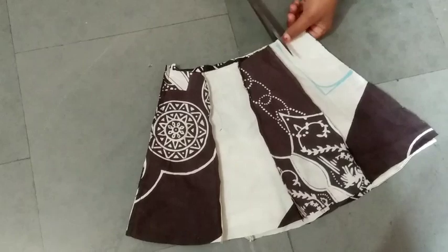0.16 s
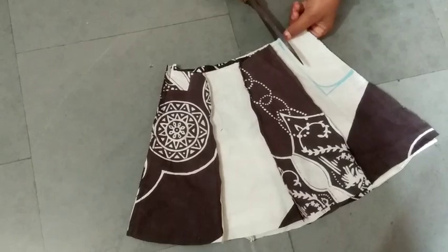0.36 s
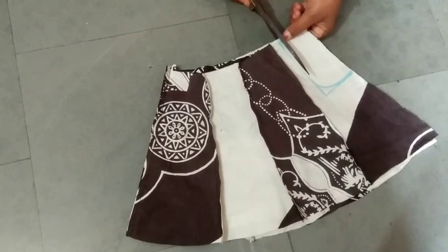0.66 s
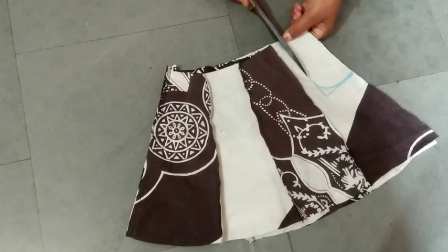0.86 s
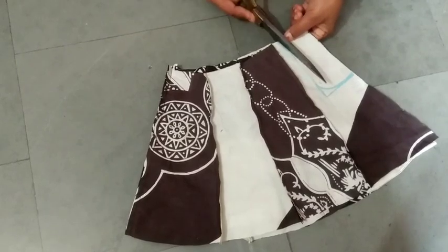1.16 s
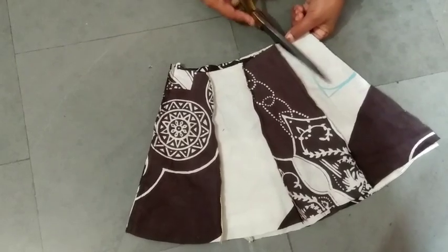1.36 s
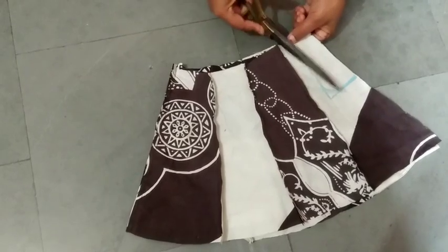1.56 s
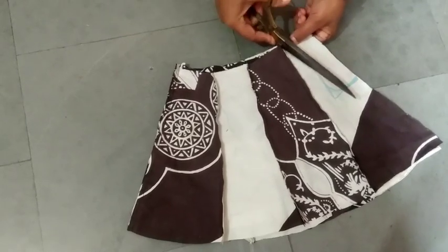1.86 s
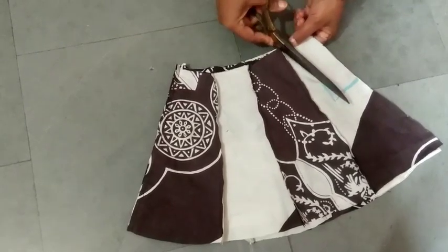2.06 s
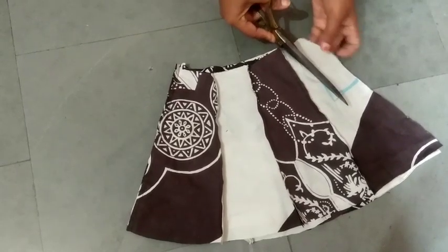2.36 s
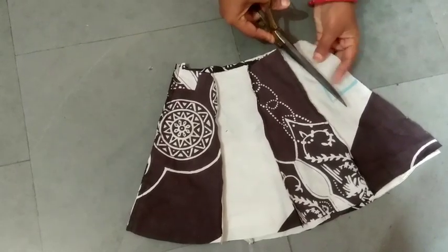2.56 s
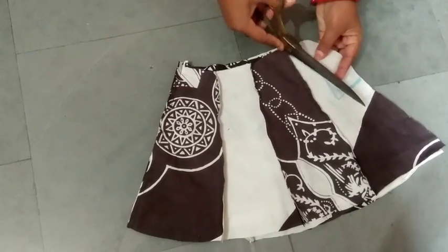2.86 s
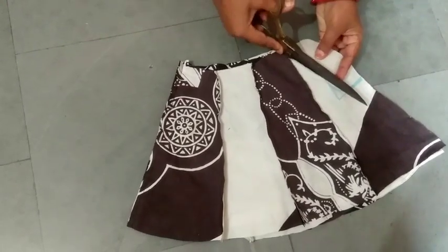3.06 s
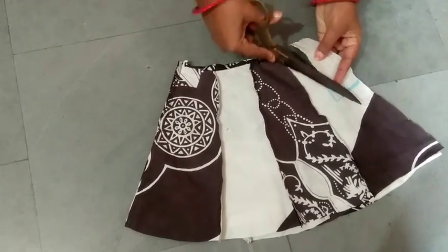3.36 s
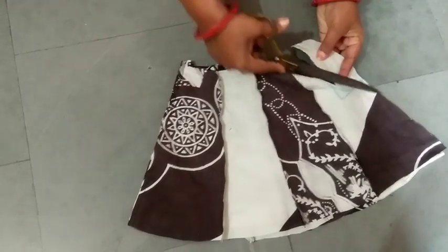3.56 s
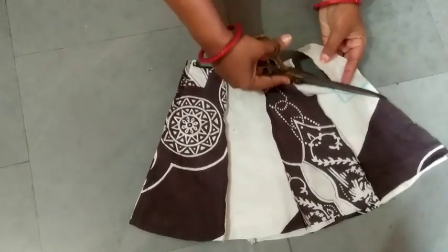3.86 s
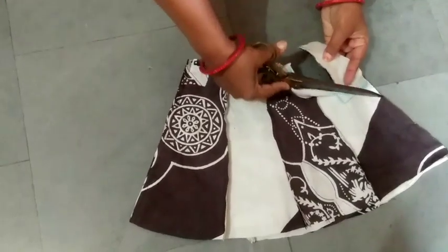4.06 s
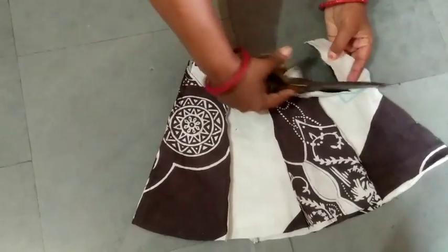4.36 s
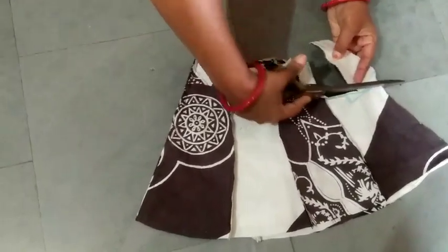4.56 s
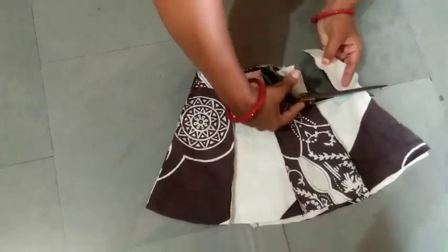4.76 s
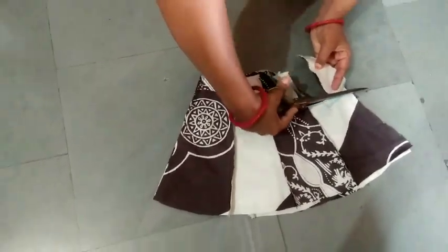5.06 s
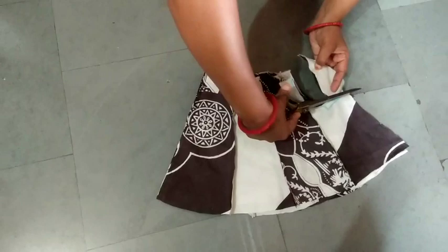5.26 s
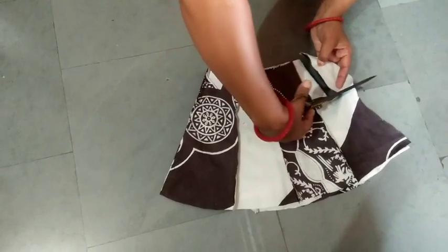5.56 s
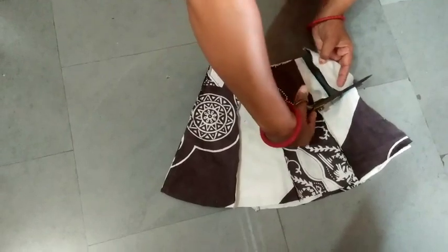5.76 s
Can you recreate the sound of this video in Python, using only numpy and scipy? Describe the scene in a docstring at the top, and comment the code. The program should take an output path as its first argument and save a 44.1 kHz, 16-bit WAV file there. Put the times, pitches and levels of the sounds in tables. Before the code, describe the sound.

Close scissor cuts through layered cloth in a small hard room, metallic and bright, with scraping blades, faint rustle and soft hand bumps.

```python
"""A small hard room with a stone floor, where heavy tailor's shears cut folded cotton cloth.
Each closing stroke snaps a run of threads (clumped noise snaps) that rings the blades (resonant filters).
Between strokes the edges slide apart with a hiss, one blade sings at times and the lower blade skids over the
stone with a gliding rasp. Steel ticks as the blades meet, hands bump and rumble softly, the cloth rustles,
and a short room tail and steady air noise lie around it all."""
import sys
import numpy as np
from scipy import signal
from scipy.fft import rfft, irfft, next_fast_len
from scipy.io import wavfile
from scipy.ndimage import uniform_filter1d, map_coordinates

SR = 44100
rng = np.random.default_rng(int(sys.argv[2]) if len(sys.argv) > 2 else 0)


def persist_wave(psi):
    """Save psi, clipped to +-1, as 16-bit WAV."""
    counts = np.round(np.clip(psi, -1, 1) * 32767).astype(np.int16)
    wavfile.write(sys.argv[1], SR, np.atleast_2d(counts).T)


N = 259964
T = np.arange(N) / SR

# All table levels are relative: each layer adds its own gain where it is mixed.
# Closing strokes. Each row: start in seconds, attack in seconds, hold in seconds, shearing level in dB,
# level of the blades' low ring in dB, level of its overtones in dB, resting pitch of the low ring in Hz.
CLOSING_STROKES = [(0.775, 0.067, 0.044, -29, -53, -48.5, 2621),
                   (1.212, 0.047, 0.064, -35.5, -47.5, -45.5, 2647),
                   (1.575, 0.065, 0.042, -30, -47, -45, 2555), (1.982, 0.069, 0.031, -28, -46, -48.5, 2540),
                   (3.186, 0.0081, 0.11, -34.5, -45, -54, 2587),
                   (4.074, 0.015, 0.056, -33.5, -47, -52.5, 2459),
                   (4.168, 0.018, 0.097, -42, -54, -68, 2527),
                   (5.098, 0.0062, 0.2, -43.5, -64, -61.5, 2514),
                   (5.807, 0.037, 0.054, -33.5, -54.5, -51, 2413)]
# Edge sliding on edge as the blades open or meet. Each row: start in seconds, attack in seconds,
# hold in seconds, hiss level in dB, bright fizz level in dB.
EDGE_SLIDES = [(0.0, 0.00036, 0.016, -43, -40), (0.07, 0.025, 0.1, -54.5, -51),
               (0.29, 0.023, 0.016, -53, -61), (0.36, 0.021, 0.49, -62, -72),
               (0.735, 0.04, 0.14, -46, -40.5), (0.98, 0.053, 0.081, -46, -42.5),
               (1.203, 0.022, 0.064, -41, -33.5), (1.36, 0.032, 0.026, -41.5, -38),
               (1.45, 0.028, 0.067, -50, -44), (1.598, 0.0049, 0.057, -40, -48),
               (1.78, 0.046, 0.091, -49.5, -42.5), (1.98, 0.0073, 0.04, -45, -56),
               (2.12, 0.03, 0.026, -54, -46), (2.566, 0.0081, 0.011, -55, -53),
               (2.698, 0.0079, 0.027, -52.5, -55), (2.8, 0.041, 0.12, -57, -56.5),
               (3.012, 0.0067, 0.041, -53.5, -56), (3.115, 0.016, 0.023, -48.5, -48),
               (3.35, 0.023, 0.025, -44, -39), (3.42, 0.011, 0.012, -42.5, -47),
               (3.5, 0.0087, 0.091, -43, -44), (3.62, 0.026, 0.045, -42, -45),
               (3.96, 0.033, 0.028, -42.5, -62), (4.22, 0.026, 0.042, -42, -49),
               (4.365, 0.013, 0.026, -47, -38), (4.45, 0.039, 0.21, -56.5, -54),
               (4.983, 0.013, 0.04, -43, -41.5), (5.102, 0.0073, 0.034, -40, -52),
               (5.3, 0.058, 0.014, -46, -42.5), (5.41, 0.023, 0.067, -55, -41.5),
               (5.772, 0.011, 0.093, -50.5, -39)]
# The blades' first bending mode, before its pitch sinks in each cut. Each row: centre in Hz,
# width in Hz of a single resonator, level in dB, left-right balance in dB.
LOW_RING_MODES = [(2590, 293, 0, 12.3)]
# Resonances of the sliding edges, before any glide. Each row: centre in Hz, width in Hz, level in dB,
# left-right balance in dB.
EDGE_MODES = [(7194, 1510, -1.5, -13.5), (7620, 1450, 4.5, -9.5), (8870, 520, 8, -8), (9250, 130, -10, -18)]
# Upper resonances of the edges. Each row: centre in Hz, width in Hz, level in dB, left-right balance in dB.
UPPER_EDGE_MODES = [(11080, 2200, -4.5, 8), (12280, 870, 11, 2.5), (13900, 2250, 5, 5.5),
                    (14700, 580, 4, -8)]

CUT_FALL_DB_PER_S, SLIDE_FALL_DB_PER_S = 237, 210  # how fast a movement dies away
SWELL_DB = 6  # how far single blade modes swell and fade


def amp(db):
    """Decibels to gain."""
    return 10 ** (np.asarray(db) / 20)


def unit(x):
    """Scale to rms 1."""
    return x / np.sqrt(np.mean(x ** 2) + 1e-20)


def along(points, hz):
    """Read (Hz, value) points on a log frequency axis."""
    f, v = np.transpose(points)
    return np.interp(np.log(hz + 1), np.log(f + 1), v)


def add(track, s, sound):
    """Mix a sound into a track at time s."""
    start = max(round(s * SR), 0)
    part = track[..., start:start + sound.shape[-1]]
    part += sound[..., :part.shape[-1]]


def balance(db):
    """Left and right gains that differ by db; positive leans to the left."""
    return amp([[db / 2], [-db / 2]])


def wobble(rate):
    """A smooth random curve, rate knots a second."""
    knots = rng.standard_normal(int(N * rate / SR) + 4)
    return map_coordinates(knots, [T * rate])


def envelope(attack, hold, fall_db_per_s):
    """One movement gathers speed, holds and dies away."""
    t = np.arange(SR * 3 // 4) / SR
    rise = np.minimum(t / attack, 1) ** 2
    return rise * amp(-fall_db_per_s * np.maximum(t - attack - hold, 0))


def strokes(rows, fall_db_per_s):
    """Rows of (start, attack, hold, levels) become one gain over time for each level; overlaps add as power."""
    power = np.zeros((len(rows[0][3:]), N))
    for start, attack, hold, *levels_db in rows:
        gains = np.outer(amp(levels_db), envelope(attack, hold, fall_db_per_s))
        add(power, start, gains ** 2)
    return np.sqrt(power)


def filtered(x, response):
    """Multiply the spectrum of x by a response of frequency."""
    m = next_fast_len(N + SR // 4)
    return irfft(rfft(x, m) * response(np.fft.rfftfreq(m, 1 / SR)), m)[..., :N]


def noise(spectrum):
    """Coloured stereo noise of rms 1, nearly mono in the bass."""
    # Likeness of the two sides. Each row: frequency in Hz, left-right correlation.
    likeness = [(40, .45), (170, .75), (300, .85), (600, .75), (1200, .45), (2500, .1), (10000, 0)]

    def mid_and_side(hz):
        turn = np.arccos(np.clip(along(likeness, hz), -1, 1)) / 2
        return amp(along(spectrum, hz)) * [np.cos(turn), np.sin(turn)]
    mid, side = filtered(rng.standard_normal((2, N)), mid_and_side)
    return unit(np.array([mid + side, mid - side]))


def crackle(rate, spread_db, clump_hz, clump_db):
    """Tiny snaps, rate a second, that come in clumps; each reaches the two microphones with its own phase."""
    snaps = (rng.random(N) < rate / SR) * amp(spread_db * np.clip(rng.standard_normal(N), -2, 2))
    phase = rng.uniform(0, 2 * np.pi, (2, N))
    pair = snaps * np.cos(phase) + np.roll(snaps * np.sin(phase), 1, axis=1)
    return unit(pair * amp(clump_db * np.clip(wobble(clump_hz), -2, 2)))


def catches(rate, t60, spread_db):
    """Force builds and lets go at random moments: sudden steps that die away."""
    t = np.arange(SR // 10) / SR
    steps = (rng.random(N) < rate / SR) * amp(spread_db * np.clip(rng.standard_normal(N), -1.5, 1.5))
    decay_power = amp(-120 * t / t60)  # twice the dB, as powers are summed
    power = signal.fftconvolve(steps ** 2, decay_power)[:N]
    return unit(np.sqrt(np.abs(power)))


def ring(x, modes, order=1):
    """Drive steel resonances that radiate unevenly to left and right; a higher order steepens their flanks."""
    def response(f):
        total = 0
        for k, (centre, width, db, pan_db) in enumerate(modes):
            resonance = 1j * f * width / (centre * centre - f * f + 1j * f * width)
            total = total + (-1) ** k * amp(db) * balance(pan_db) * resonance ** order
        # a narrow blade radiates little below its first mode
        return total * f ** 8 / (f ** 8 + (.75 * modes[0][0]) ** 8)
    return filtered(x, response)


def travelling(x, depth_db):
    """The crossing point travels along the edges, so that single blade modes swell and fade."""
    z = signal.stft(x, nperseg=512)[2]
    field = rng.standard_normal(z.shape) + rng.standard_normal(z.shape[1:])  # part own, part shared by both sides
    for _ in range(2):
        field = uniform_filter1d(uniform_filter1d(field, size=3, axis=1), size=14, axis=2)
    gain = amp(depth_db * np.clip(unit(field), -2.5, 1.3))
    gain /= np.sqrt(uniform_filter1d(gain ** 2, size=30, axis=1))  # neighbouring modes share the same energy
    return signal.istft(z * gain, nperseg=512)[1][:, :N]


def gliding(x, ratio):
    """Shift the pitch of a steady rasp by a ratio that changes over time."""
    return np.array([map_coordinates(side, [np.cumsum(ratio)], mode="mirror") for side in x])


def sinking(x, bend=.06, bend_s=0.075):
    """In each cut a ring starts sharp by the share bend and sinks to a resting pitch set by the grip."""
    ratio = np.ones(N)
    for start, *_, rest_hz in CLOSING_STROKES:
        since = T[T >= start] - start
        ratio[T >= start] = rest_hz / LOW_RING_MODES[0][0] * (1 + bend * np.exp(-since / bend_s))
    return gliding(x, ratio)


def floor_bounce(x, delay=0.0005087, share=0.93, sway=0.089):
    """The stone floor mirrors the blades; the notches glide as the shears rise and sink."""
    late = [np.interp(T - delay * (1 + sway * wobble(5.2)), T, side) for side in x]
    return (x - share * np.array(late)) / np.hypot(1, share)


def room_tone():
    """Steady air noise, coloured by the room's modes."""
    # Spectrum of the air noise. Each row: frequency in Hz, level in dB.
    air = [(15, -34), (25, -12), (75, -15.5), (160, -2), (331, 4.5), (919, -9.5), (1800, -5), (2630, -5),
           (4750, -12), (8810, -14.5), (9550, -23.5), (12800, -14.5), (15500, -20)]
    # Bumps that the room adds. Each row: centre in Hz, width in Hz, height in dB.
    bumps = [(729, 177, 6), (1496, 100, 8)]

    def colour(hz):
        return amp(sum(db / (1 + (2 * (hz - centre) / width) ** 2) for centre, width, db in bumps))
    return amp(-59.5) * filtered(noise(air), colour)


def room(x):
    """Hard walls answer about 4 ms later with a short noise tail, its own for each side."""
    # Decay of the tail. Each row: frequency in Hz, time to fall by 60 dB in seconds.
    decay = [(200, 0.28), (2500, 0.088), (8000, 0.28), (15000, 0.04)]
    hz, t, z = signal.stft(rng.standard_normal((2, SR // 2)), SR, nperseg=256)
    tail = signal.istft(z * amp(-60 * t / along(decay, hz)[:, None]), SR, nperseg=256)[1]
    late = np.pad(x, ((0, 0), (180, 0)))
    return signal.fftconvolve(late, tail / np.linalg.norm(tail[0]), axes=1)[:, :N]


def rustling(rest_db=-73, swing_db=5, drag_db=-22, brush_db=-23):
    """The held cloth rustles faintly in quick small shifts, and more as the blades drag or brush it."""
    # Spectrum of the rustle. Each row: frequency in Hz, level in dB.
    rustle = [(300, -53), (700, 5), (1500, 2), (2300, -0.5), (4000, -57)]
    _, ring_gain, _ = strokes([cut[:-1] for cut in CLOSING_STROKES], CUT_FALL_DB_PER_S)
    hiss_gain, _ = strokes(EDGE_SLIDES, SLIDE_FALL_DB_PER_S)
    moved = np.hypot(amp(drag_db) * ring_gain, amp(brush_db) * hiss_gain)
    resting = amp(rest_db + swing_db * np.clip(wobble(16), -2, 1.5))
    return np.hypot(resting, moved) * noise(rustle)


def handling(pan_db=8, lead=0.067, attack=0.037, fall_db_per_s=276, rest_db=-72, stir_db=4.5):
    """A hollow low rumble swells as the hands shift on the cloth; the left side leads by an angle in radians."""
    # Shifts of the hands. Each row: start in seconds, hold in seconds, level in dB.
    hand_shifts = [(0.07, 0.052, -64.5), (0.22, 0.037, -59), (0.627, 0.054, -54.5), (0.815, 0.047, -55.5),
                   (0.975, 0.046, -55.5), (1.143, 0.013, -56), (1.391, 0.032, -55), (1.622, 0.19, -59),
                   (2.157, 0.012, -53), (2.315, 0.028, -54), (3.895, 0.023, -60.5), (4.193, 0.013, -58),
                   (4.569, 0.098, -59), (4.67, 0.037, -51), (5.01, 0.015, -51.5), (5.258, 0.017, -57.5),
                   (5.348, 0.1, -51.5), (5.5, 0.023, -46.5), (5.577, 0.1, -46.5), (5.755, 0.062, -56.5)]
    # Spectrum of the rumble. Each row: frequency in Hz, level in dB.
    rumble = [(30, -25), (90, -18.5), (140, -6.5), (176, 7), (220, -11.5), (320, -14), (500, -31),
              (1200, -78)]
    shifts = strokes([(s, attack, hold, db) for s, hold, db in hand_shifts], fall_db_per_s)
    stirring = amp(rest_db + stir_db * np.clip(wobble(9.0), -2, 1.5))  # small movements in between
    sides = balance(pan_db) * np.exp([[.5j * lead], [-.5j * lead]])
    return np.hypot(shifts, stirring) * filtered(noise(rumble), lambda hz: sides)


def knocking(t60=0.039, attack=0.0016):
    """Hands and handles knock on the cloth, which cushions each knock to a few dull sine cycles."""
    # Soft knocks. Each row: start in seconds, level in dB, pitch in Hz.
    knocks = [(0.009, -50, 327), (0.264, -57, 410), (0.682, -54.5, 343), (0.709, -59.5, 714),
              (0.799, -60.5, 708), (0.912, -56.5, 317), (1.119, -61, 318), (1.218, -57, 333),
              (1.338, -54, 320), (1.812, -61, 715), (1.852, -59, 350), (2.17, -61.5, 730),
              (2.345, -68, 318), (2.621, -56.5, 410), (3.146, -60, 420), (3.922, -56, 410),
              (4.106, -59, 275.6), (4.313, -58, 710), (4.415, -63.5, 666), (4.807, -57.5, 425),
              (4.927, -60, 310), (5.314, -62.5, 737), (5.545, -43.5, 252), (5.796, -51, 190.3)]
    t = np.arange(SR // 5) / SR
    shape = amp(-60 * t / t60) * (1 - np.exp(-t / attack))
    track = np.zeros(N)
    for s, db, hz in knocks:
        add(track, s, amp(db + 18.0) * np.sin(2 * np.pi * hz * t) * shape)
    return track * balance(-1)


def ticking(t60=0.041, swell=0.0048, attack=0.00022):
    """Short steel contacts ring the upper resonances at once; the middle ones take a moment to build."""
    # Ticks as the blades meet. Each row: start in seconds, level in dB,
    # level of the middle resonances relative to the tick in dB.
    ticks = [(0.769, -42, -9), (0.8067, -22.5, -11), (0.9114, -23, -2), (1.2141, -43, -11), (1.6, -26, -11),
             (1.9938, -26, -5), (2.577, -40, 10), (2.705, -48, 10), (2.757, -38.5, -6), (3.015, -29.5, -28),
             (3.1977, -25, -4), (3.418, -25, -5), (4.084, -25, -2.5), (4.672, -51, 3), (4.705, -39, -12),
             (4.995, -49, -8), (5.008, -34, -9), (5.037, -36, 0), (5.102, -35, 5.5), (5.126, -21.5, -4),
             (5.7823, -30, -18)]
    t = np.arange(SR // 16) / SR
    upper, middle = np.zeros(N), np.zeros(N)
    burst = amp(-60 * t / t60) * (1 - np.exp(-t / attack))
    building = burst * (1 - np.exp(-t / swell))
    for s, db, ring_db in ticks:
        add(upper, s, amp(db) * burst)
        add(middle, s, amp(db + ring_db) * building)
    contact = rng.standard_normal((2, N))
    bright = upper * unit(ring(contact, UPPER_EDGE_MODES))
    return amp(-6) * bright + amp(5.5) * middle * unit(ring(contact, EDGE_MODES))


def bunching():
    """Folded layers squeezed ahead of the edges give way in uneven bursts: a coarser, duller crunch."""
    # Cloth bunches between the blades. Each row: start in seconds, attack in seconds, hold in seconds, level in dB.
    bunches = [(1.37, 0.024, 0.12, -72.5), (4.15, 0.054, 0.089, -65), (4.37, 0.033, 0.31, -77.5),
               (5.12, 0.08, 0.043, -58)]
    # Spectrum of the crunch. Each row: frequency in Hz, level in dB.
    cloth = [(1200, -31), (2000, -2), (2500, -10.5), (4000, 2.5), (5000, -5), (8000, -23)]
    fibres = crackle(rate=2600, spread_db=2, clump_hz=110, clump_db=2.2)
    fibres = fibres * catches(rate=130, t60=.07, spread_db=2)
    crunch = travelling(filtered(fibres, lambda hz: amp(along(cloth, hz))), SWELL_DB)
    return amp(13.5) * unit(crunch) * strokes(bunches, CUT_FALL_DB_PER_S)


def skidding(pan_db=-13, between_db=-37, attack=0.042, swell=0.31, fall_db_per_s=335, strand_db=4.5):
    """Grit under the lower blade rasps in two resonances that glide with the contact point on the stone."""
    # Skids over the floor. Each row: start in seconds, hold in seconds, level in dB, resonance at the start in Hz,
    # at the end in Hz, its width in Hz, distance to a second resonance in Hz, relative level of the second in dB.
    skids = [(0.018, 0.03, -51, 5170, 5780, 450, -1400, -16),
             (0.096, 0.053, -49, 6800, 5650, 660, -1000, -9), (0.544, 0.11, -48, 6200, 4020, 554, 2200, -7),
             (0.772, 0.037, -47.5, 6600, 6400, 600, 1200, -2), (0.982, 0.11, -59, 7760, 7000, 500, 1200, 2),
             (1.082, 0.065, -54.5, 4400, 3660, 347, 2308, 1), (1.44, 0.1, -56, 6600, 5760, 534, -2000, -43),
             (1.744, 0.059, -53, 3000, 3800, 330, 950, 1), (2.132, 0.027, -53, 3970, 4340, 248, 1152, 6),
             (2.378, 0.017, -48, 5400, 5930, 320, -2000, -10.5),
             (3.001, 0.11, -51, 6600, 5560, 520, -1150, -11.5),
             (3.725, 0.043, -58, 6670, 6150, 300, -2400, -19),
             (3.769, 0.15, -48.5, 3720, 3210, 380, 2609, -25),
             (3.781, 0.055, -50, 7200, 8050, 597, -1200, -34),
             (3.925, 0.034, -53, 7200, 7970, 604, -1650, -11),
             (3.856, 0.037, -55, 4320, 4430, 499, 1493.5, -28),
             (4.131, 0.12, -45.5, 6030, 5820, 500, -1900, -14.5),
             (4.583, 0.055, -58.5, 6550, 6400, 500, -1900, -23),
             (4.806, 0.0039, -58.5, 4420, 4700, 500, 3004, 11),
             (5.004, 0.044, -55.5, 4770, 4860, 400, 1900, 9),
             (5.045, 0.11, -47, 7500, 5070, 875, -1700, -17),
             (5.311, 0.017, -47, 4500, 4030, 700, 2300, -16),
             (5.601, 0.0065, -62.5, 4070, 4010, 250, 2100, -17)]
    grit = crackle(rate=5100, spread_db=0.0, clump_hz=143.8, clump_db=2.5)
    grit = travelling(grit, strand_db)  # splits the rasp into single strands
    track = np.zeros((2, N))
    for s, hold, db, from_hz, to_hz, width_hz, second_hz, second_db in skids:
        # a long skid still gathers speed for a share of its hold
        shape = envelope(attack + swell * hold, (1 - swell) * hold, fall_db_per_s)
        piece = np.roll(grit, -round(s * SR), axis=1)[:, :len(shape)]
        hz, t, z = signal.stft(piece, SR, nperseg=512)
        offset = hz[:, None] - np.interp(t, [0, attack + hold], [from_hz, to_hz])
        first = 1 / (1 + (offset / width_hz) ** 2) ** 2
        second = 1 / (1 + ((offset - second_hz) / width_hz) ** 2) ** 2
        modes = first + amp(second_db) * second + amp(between_db)
        radiated = amp(along([(1500, -38), (2400, -3), (3200, 13.5), (7000, 4.0), (12000, -13)], hz))
        rasp = signal.istft(z * modes * radiated[:, None], SR, nperseg=512)[1][:, :len(shape)]
        add(track, s, amp(db + 7.0) * unit(rasp * balance(pan_db)) * shape)
    return track


def singing(width_hz=260, flutter_hz=65, flutter_db=4.5, pan_db=-9):
    """A light graze of the edges holds one blade in a single mode, which flutters as the contact comes and goes."""
    # Singing grazes. Each row: start in seconds, attack in seconds, hold in seconds, level in dB, pitch in Hz.
    grazes = [(1.04, 0.015, 0.14, -59, 4200), (1.484, 0.014, 0.013, -56, 4290),
              (1.809, 0.0085, 0.026, -52, 6410), (1.815, 0.011, 0.015, -52, 2530),
              (2.158, 0.015, 0.013, -54.5, 3390), (2.974, 0.0092, 0.008, -59.5, 4180),
              (3.193, 0.0091, 0.036, -49, 3340), (3.328, 0.024, 0.081, -50.5, 3300),
              (3.476, 0.035, 0.049, -49, 3310), (3.655, 0.036, 0.034, -55.5, 3300),
              (4.387, 0.013, 0.015, -62, 2520), (4.684, 0.006, 0.0063, -57, 2920),
              (5.042, 0.015, 0.032, -53, 3395)]
    track = np.zeros((2, N))
    for s, attack, hold, db, hz in grazes:
        shape = envelope(attack, hold, SLIDE_FALL_DB_PER_S)
        b, a = signal.iirpeak(hz, hz / width_hz, SR)
        tone = rng.standard_normal((2, len(shape)))
        for _ in range(2):  # two passes narrow the mode further
            tone = signal.lfilter(b, a, tone)
        add(track, s, amp(db) * unit(tone) * shape)
    flutter = unit(amp(flutter_db * np.clip(wobble(flutter_hz), -2, 1.5)))
    return track * flutter * balance(pan_db)


def sliding(rest_hz=8400):
    """The ground edges rub with a fine grain and catch lightly on each other."""
    # The hiss rises and falls as the contact moves along the edges. Each row: time in seconds, centre in Hz;
    # at a centre of rest_hz its resonances lie as listed.
    hiss_pitch = [(0.1, 7960), (0.4, 8560), (0.6, 7720), (0.8, 8460), (1.85, 8070), (2.6, 8260),
                  (3.15, 8315), (3.65, 8925), (3.95, 7824), (4.7, 8140), (5.05, 8920), (5.4, 8050)]
    rub = crackle(rate=9000, spread_db=1.5, clump_hz=117.4, clump_db=1.5)
    rub = rub * (0.73 + 0.25 * catches(rate=56, t60=0.21, spread_db=20.0))
    mirrored = floor_bounce(rub)
    hiss_gain, fizz_gain = strokes(EDGE_SLIDES, SLIDE_FALL_DB_PER_S)
    ratio = np.interp(T, *np.transpose(hiss_pitch)) / rest_hz
    hiss = unit(gliding(ring(mirrored, EDGE_MODES), ratio)) * hiss_gain
    fizz = unit(ring(mirrored, UPPER_EDGE_MODES)) * fizz_gain
    return amp(2.5) * hiss + amp(-2.5) * fizz


def cutting(bite_attack=0.0011, bite_fall_db_per_s=1087, bite_ring_db=-27, ragged_db=3, ragged_hz=75):
    """Threads part one after another at the crossing point, thick bundles in sudden bites, and shake both blades."""
    # Thick bundles give way within a stroke. Each row: start in seconds, hold in seconds, level in dB.
    bundle_bites = [(1.27, 0.001, -19.5), (1.283, 0.005, -21), (1.299, 0.0036, -24), (1.302, 0.003, -37),
                    (2.064, 0.0018, -30), (2.096, 0.0067, -25.5), (3.239, 0.006, -36), (3.264, 0.001, -34),
                    (3.283, 0.0071, -25.5), (3.295, 0.003, -28), (3.306, 0.003, -22.5),
                    (3.351, 0.0082, -30), (4.099, 0.004, -26.5), (4.115, 0.002, -32), (4.189, 0.0027, -27),
                    (4.202, 0.0086, -30), (4.244, 0.007, -29), (4.273, 0.004, -33), (4.284, 0.004, -29.5),
                    (5.201, 0.005, -31), (5.21, 0.0049, -27.5), (5.2516, 0.0029, -24), (5.287, 0.0034, -24),
                    (5.825, 0.0033, -28)]
    # Upper blade resonances under shearing. Each row: centre in Hz, width in Hz, level in dB,
    # left-right balance in dB.
    blade_modes = [(7285, 380, -3, -9.5), (8930, 540, 3, -4.5), (9650, 1060, -1, 1), (11330, 580, 6, -3.5),
                   (13250, 1500, 4, 5), (14850, 760, 6, 3)]
    # The blades' next bending modes, before their pitch sinks. Each row: centre in Hz,
    # width in Hz of a single resonator, level in dB, left-right balance in dB.
    overtone_modes = [(3330, 130, -4.5, 6), (4880, 520, -5.5, -12), (5870, 275, -0.5, -14)]
    threads = crackle(rate=3600, spread_db=2.5, clump_hz=247, clump_db=1.7)
    threads = threads * (.7 + .4 * catches(rate=150, t60=.03, spread_db=3))
    shear_gain, ring_gain, overtone_gain = strokes([cut[:-1] for cut in CLOSING_STROKES], CUT_FALL_DB_PER_S)
    bite_gain, = strokes([(s, bite_attack, hold, db) for s, hold, db in bundle_bites], bite_fall_db_per_s)

    mirrored = floor_bounce(ring(threads, blade_modes), share=0.76)
    crunch = unit(travelling(mirrored, SWELL_DB)) * shear_gain
    bundles = rng.standard_normal((2, N))
    snap = unit(ring(bundles, blade_modes)) + amp(-3.5) * unit(ring(bundles[::-1], UPPER_EDGE_MODES))
    bites = unit(snap) * bite_gain

    # the threads push the blades unevenly
    push = threads * amp(ragged_db * np.clip(wobble(ragged_hz), -2, 1.3))
    low_ring = unit(sinking(ring(push, LOW_RING_MODES, order=2)))
    body = low_ring * np.hypot(ring_gain, amp(bite_ring_db) * bite_gain)
    overtones = travelling(sinking(ring(push, overtone_modes, order=2)), SWELL_DB)
    overtones = unit(overtones) * overtone_gain
    return amp(2.5) * crunch + amp(-1.4) * bites + amp(4.5) * body + amp(5.5) * overtones


def scene():
    """The shears and the hands in the room, over its steady tone."""
    near = knocking() + ticking() + bunching() + skidding() + singing()
    near = near + travelling(sliding(), SWELL_DB) + cutting()
    return room_tone() + rustling() + handling() + amp(-6.0) * room(near) + near


def record(dry, top_hz=15650):
    """The phone's band limit: a very steep fall above top_hz."""
    return filtered(dry, lambda hz: 1 / (1 + (hz / top_hz) ** 160))


dry = scene()
out = record(dry)
persist_wave(out)
```